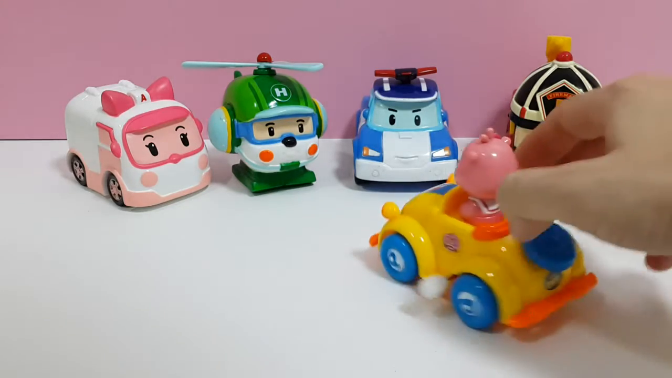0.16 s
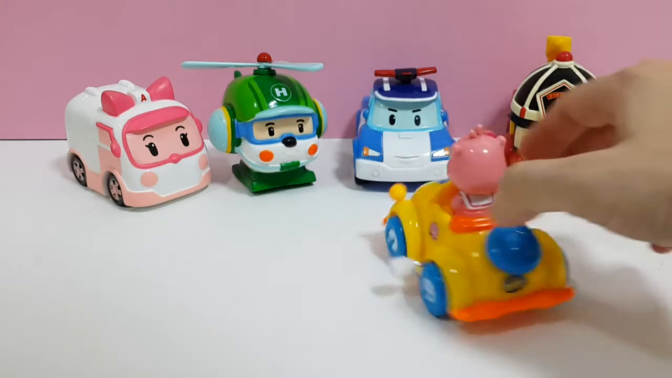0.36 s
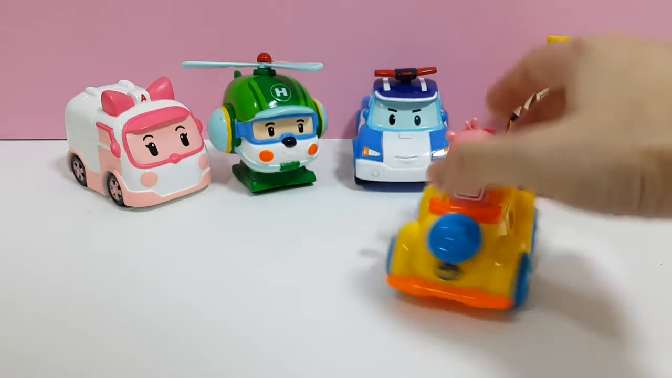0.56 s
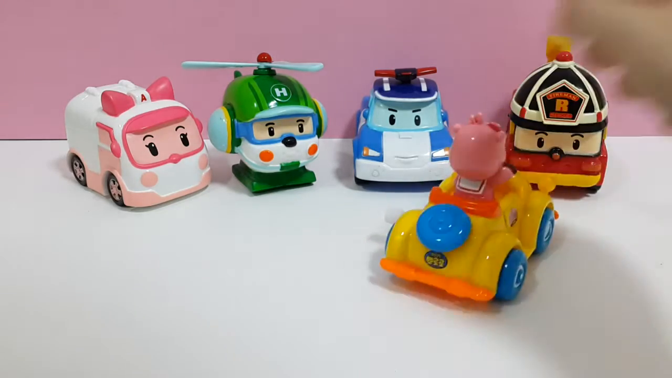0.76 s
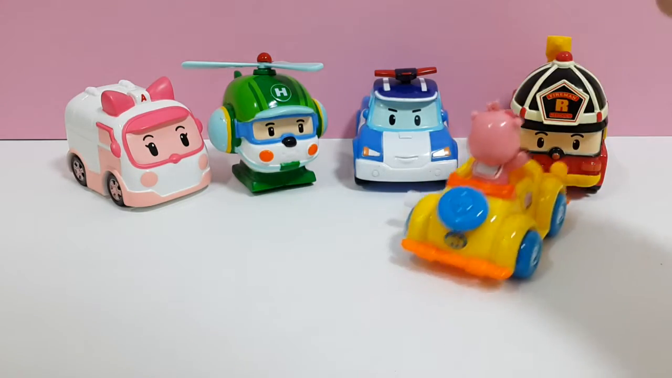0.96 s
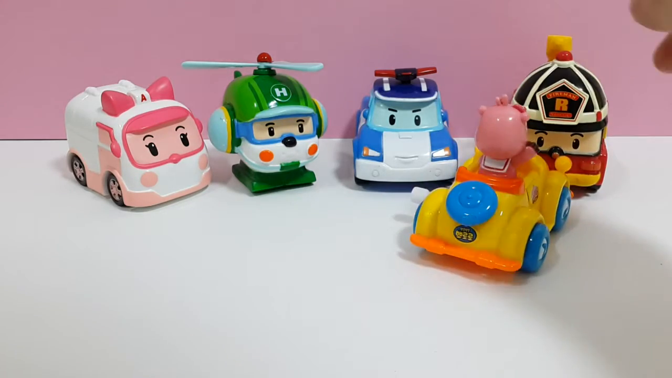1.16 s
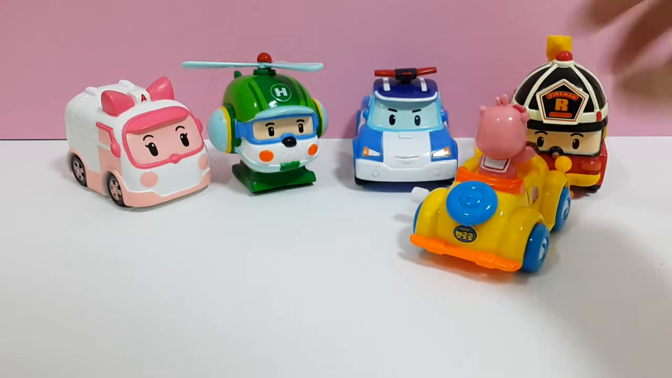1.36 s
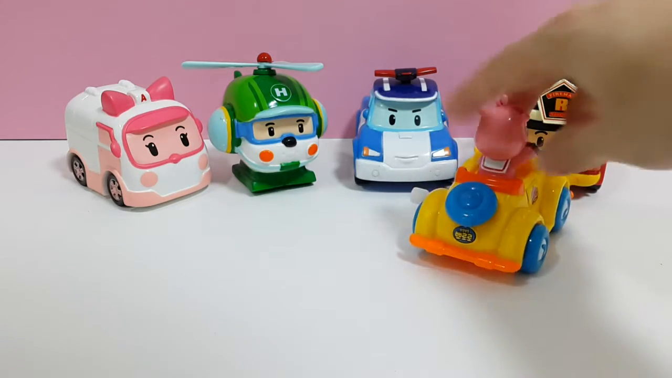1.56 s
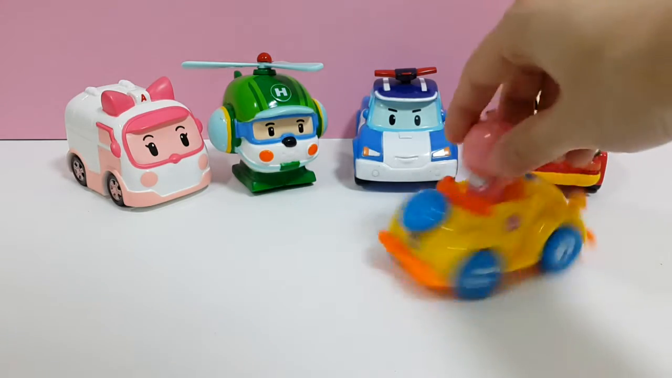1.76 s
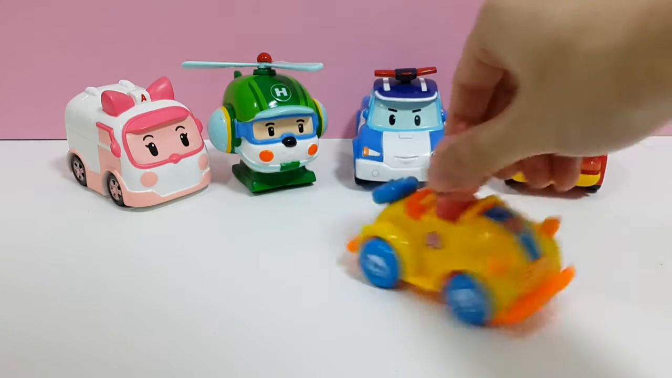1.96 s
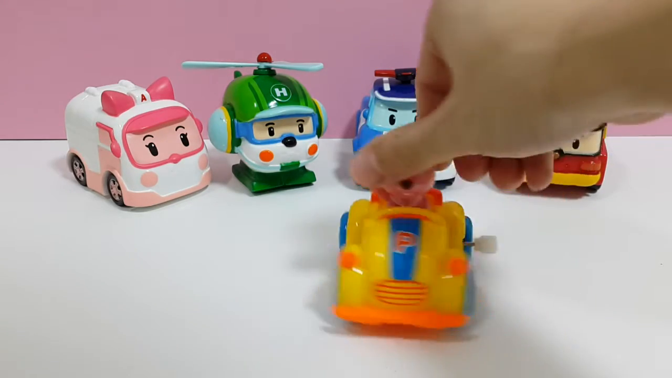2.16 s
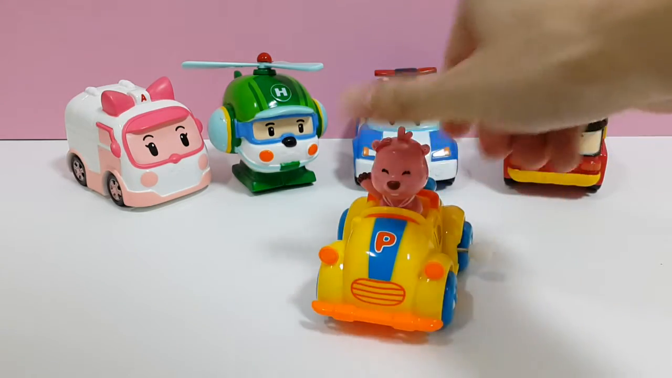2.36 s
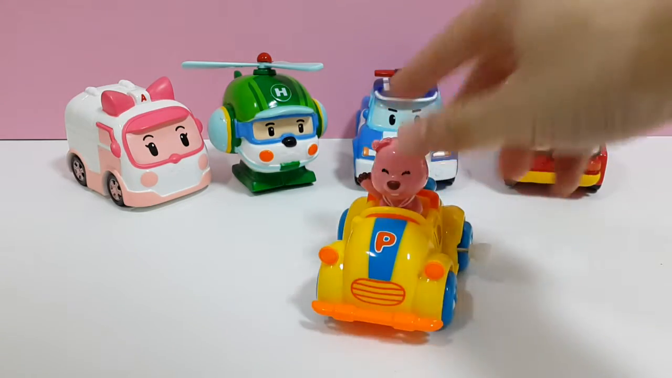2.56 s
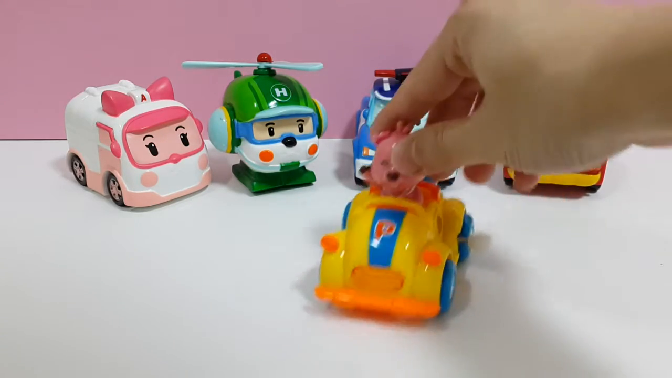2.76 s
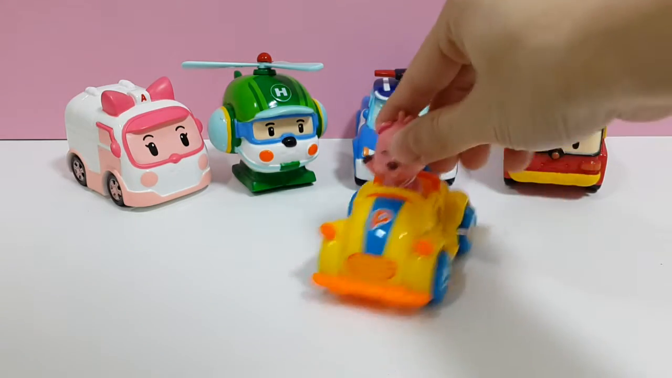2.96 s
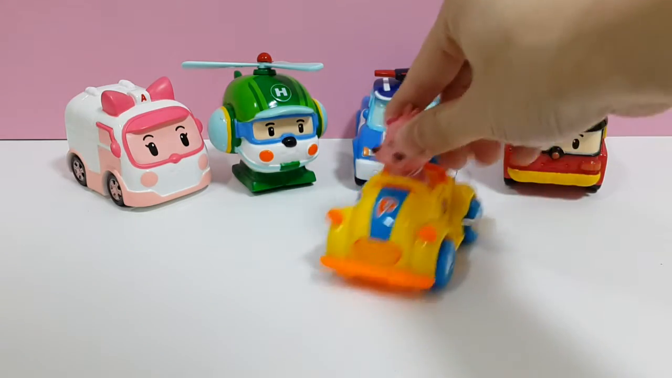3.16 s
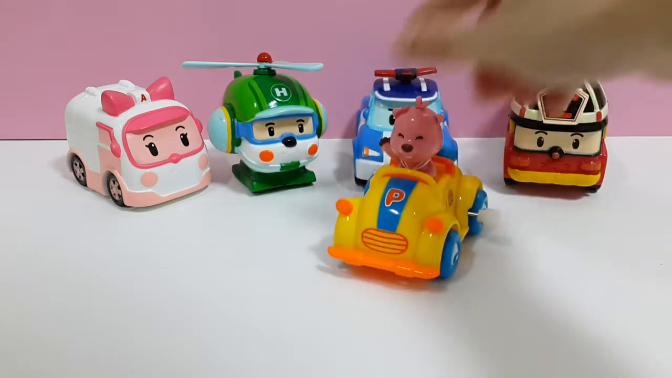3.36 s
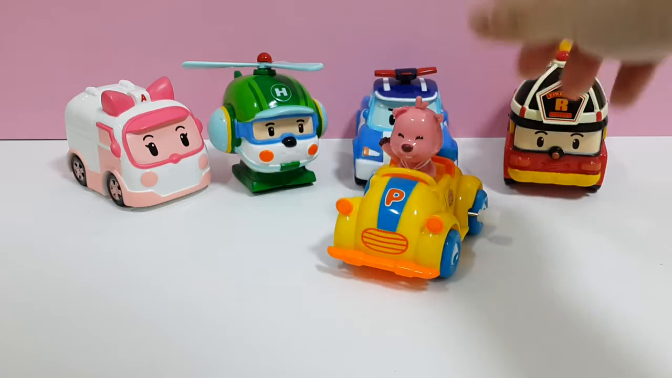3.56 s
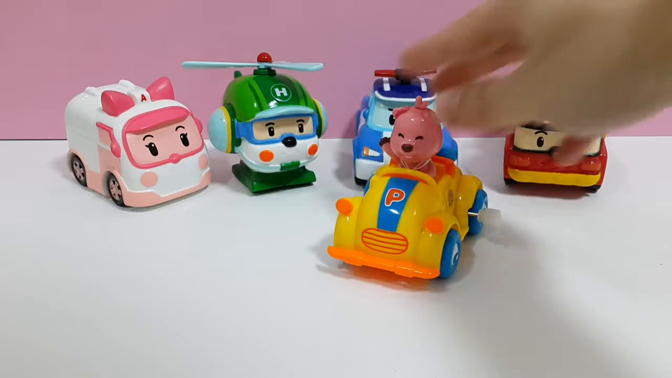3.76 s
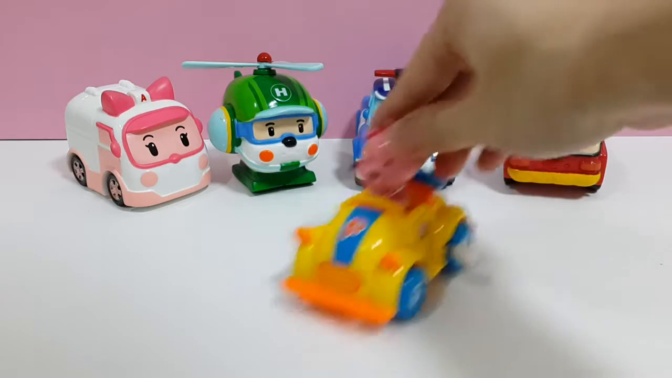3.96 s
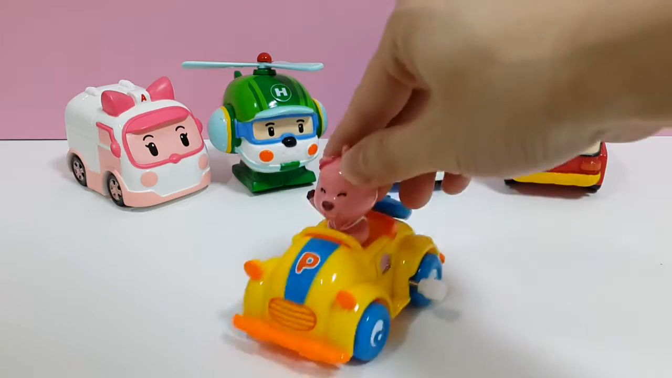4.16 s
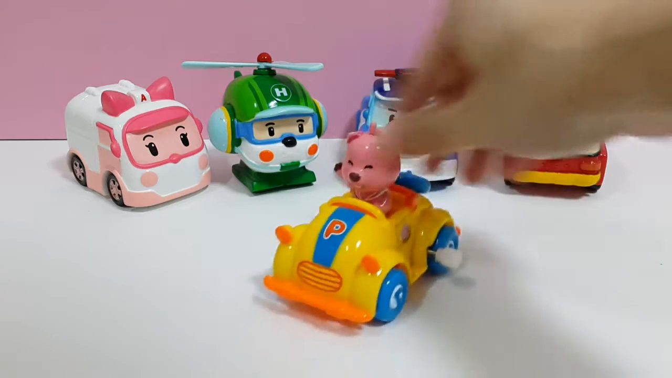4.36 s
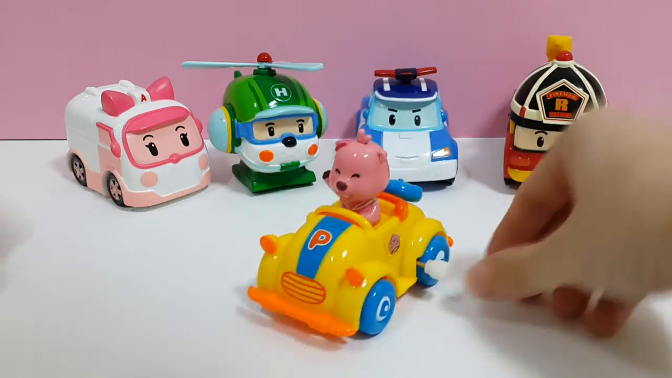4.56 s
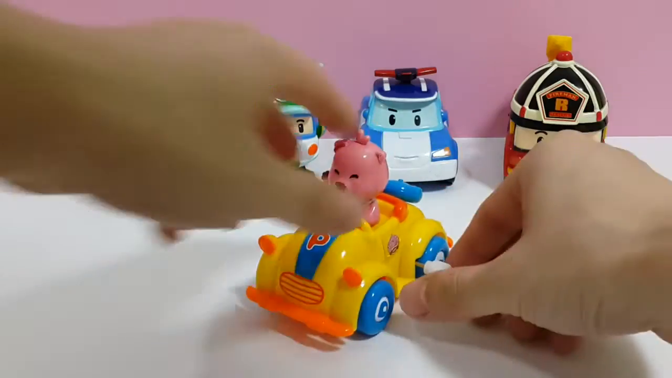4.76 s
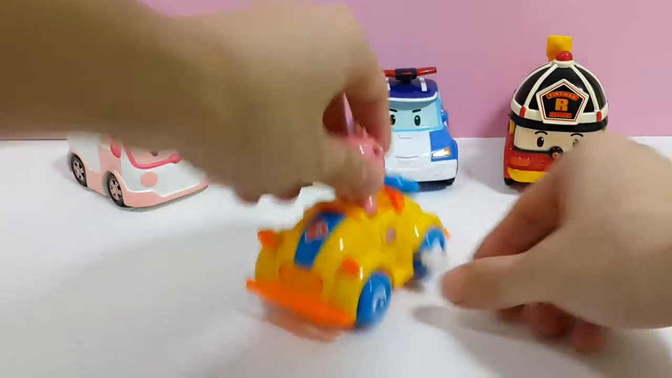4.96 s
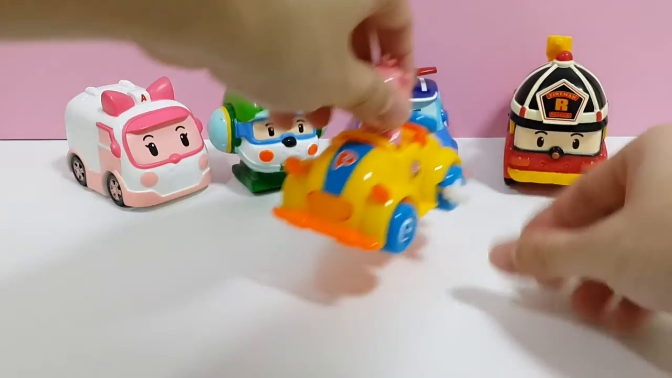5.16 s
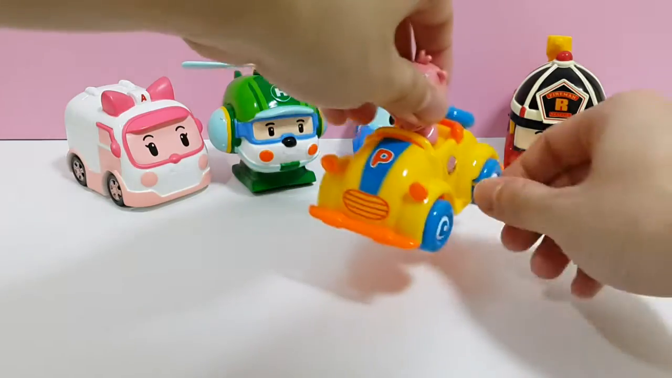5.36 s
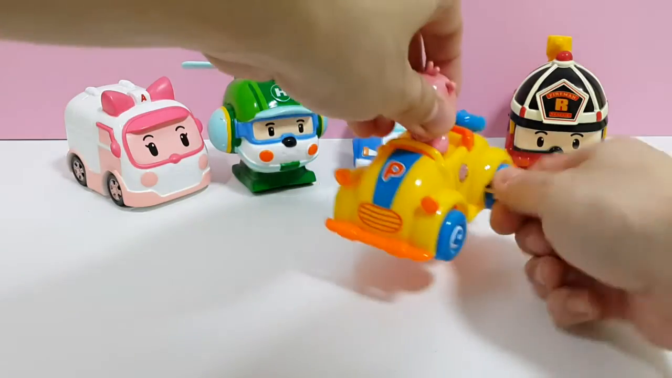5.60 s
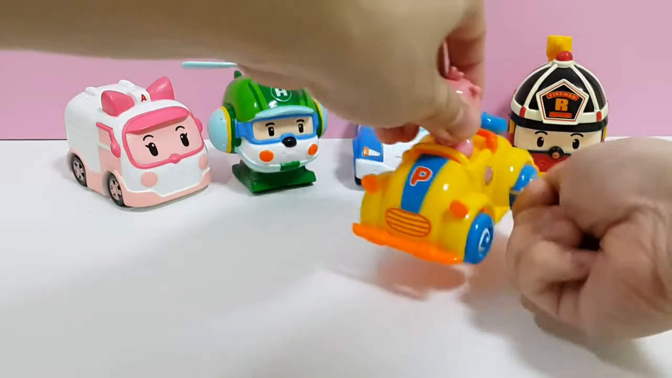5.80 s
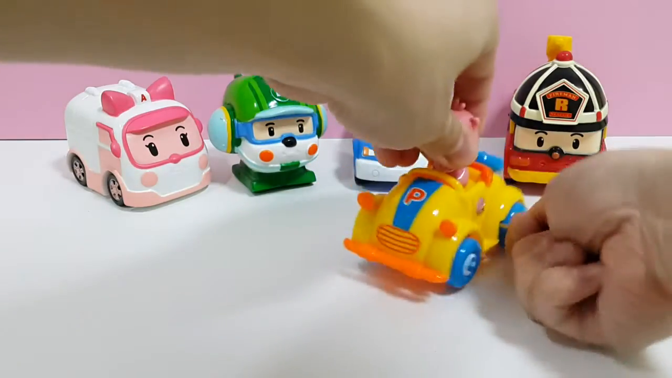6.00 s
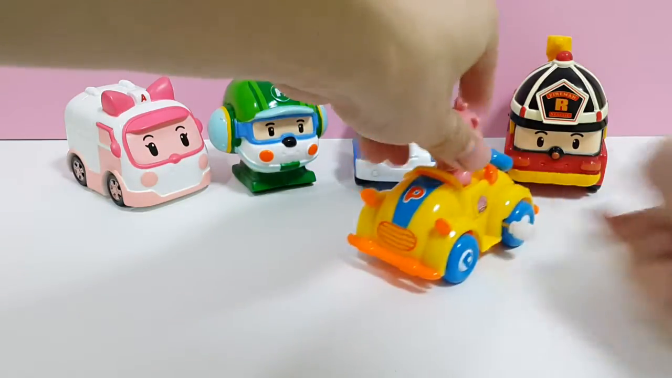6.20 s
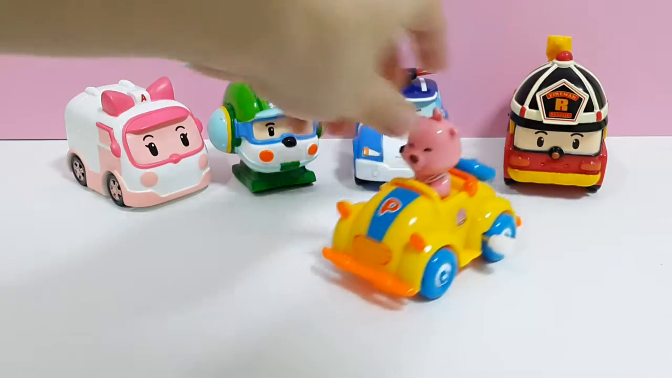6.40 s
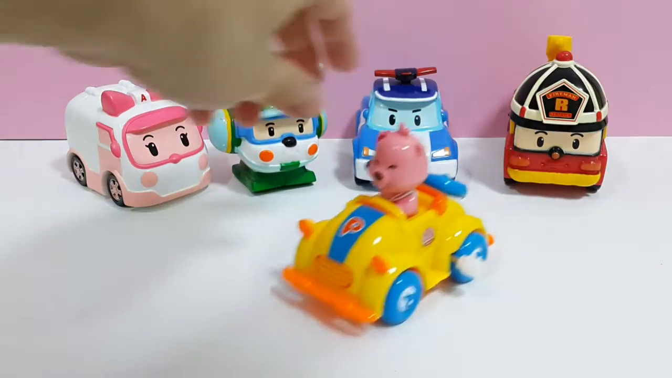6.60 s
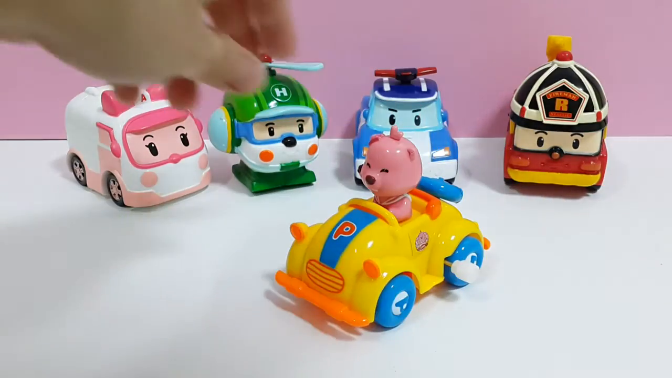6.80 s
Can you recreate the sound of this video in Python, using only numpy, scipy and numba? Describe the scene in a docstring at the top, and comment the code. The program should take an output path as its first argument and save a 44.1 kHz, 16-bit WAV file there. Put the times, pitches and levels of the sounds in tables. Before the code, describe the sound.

Close, bright plastic gear clicks come in stuttering bursts between quiet gaps, light taps and soft thuds, then a rapid key-winding ratchet and more bursts.

```python
"""In a small quiet room, a plastic wind-up car is pushed by hand on a table top close to a phone with two ports.
First the gear teeth rattle the hollow shell in bursts, and for a moment the spring runs free and clicks evenly.
Then wheels and fingers tap, faint squeaks and a high rustle pass and the table thuds, amid more gear bursts.
After taps that ring, the key's pawl snaps over its ratchet; a last group of bursts follows. Contacts are short
noise bursts through resonant modes; the room rings briefly over steady low rumble, hiss and faint tones."""
import sys
import numpy as np
from scipy import signal
from scipy.fft import rfft, irfft
from scipy.io import wavfile
from scipy.ndimage import uniform_filter1d
from numba import njit

SR = 44100
rng = np.random.default_rng(int(sys.argv[2]) if len(sys.argv) > 2 else 0)


def dump(signal):
    """Clip the signal to [-1, 1] and save it as 16-bit WAV at the path in sys.argv[1]."""
    limited = np.clip(np.atleast_2d(signal).T, -1, 1)
    pcm = np.round(limited * 32767).astype(np.int16)
    wavfile.write(sys.argv[1], SR, pcm)


N = 301644

# Single gear teeth, loud to faint, each at its own time: [t/s, relative level/dB]
SINGLE_TEETH = [(0.0507, -23), (0.075, -11), (0.098, -10), (0.1077, -7.5), (0.119, -7.5), (0.155, -8),
                (0.179, -9), (0.191, -10.5), (0.214, -8), (0.224, -7), (0.294, -9), (0.3194, -12.5),
                (0.3263, -10), (0.3365, -11), (0.416, -5.5), (0.424, -7.5), (0.435, -9.5), (0.4448, -8.5),
                (0.455, -12), (0.5814, -9.5), (0.563, -9.5), (0.76, -14.5), (1.0138, -18), (1.1067, -15),
                (1.7833, -20.5), (1.8094, -23.5), (1.9894, -19.5), (2.1947, -14.5), (2.883, -19),
                (3.0416, -18), (3.073, -20), (3.132, -18), (3.1475, -10), (3.182, -10.5), (3.2416, -12),
                (3.263, -7), (3.2739, -10.5), (3.3096, -8.5), (3.328, -12.5), (3.387, -17), (4.292, -9.5),
                (4.387, -11.5), (4.401, -11), (4.433, -8), (4.5502, -18.5), (4.576, -17), (4.622, -12.5),
                (4.6647, -13.5), (6.076, -21.5), (6.1614, -30.5), (6.1861, -34), (6.2769, -18.5),
                (6.3644, -8), (6.384, -19), (6.4486, -21), (6.5037, -12.5), (6.626, -13), (6.6489, -12)]
# Wheels and fingers tapping: [t/s, relative level/dB, low body gain/dB]
TAPS = [(1.7207, -55, 20), (1.8462, -17, 10), (2.136, -16.5, 3.5), (2.3566, -24, 11.5), (2.395, -33, 3),
        (2.835, -19, 3), (3.152, -11.5, -10), (4.1186, -38, 18), (4.1578, -35.5, 9), (4.6063, -19, -3),
        (4.7007, -25, 18), (5.0932, -22, 6.5), (5.14, -22.5, 5.5), (5.307, -42.5, 15), (5.417, -47.5, 16.5),
        (5.502, -30, 5), (5.6495, -39, 4), (6.0609, -19, 7), (6.1204, -21, 5), (6.2003, -27.5, 17.5),
        (6.2295, -14.5, 8.5), (6.745, -13, 1)]
# Mode clusters of the hollow shell: [mean f/Hz, width of one filter pass/Hz, relative level/dB]
SHELL_MODES = [(832, 420, -34), (1163, 340, -24), (1513, 210, -25), (1915, 380, -16), (2290, 670, -18.5),
               (2971, 660, -10), (4060, 1300, -8.5), (4727, 1100, -6), (5908, 1510, 0), (7230, 1300, -4.5),
               (7970, 3500, -4), (10770, 6100, -11.5), (13100, 4400, -15)]

COAST_S, COAST_DB = 0.035, -20  # the wheels drag on after the last tooth, fading by this much


def undb(db):
    """Turn dB into an amplitude factor."""
    return 10 ** (np.asarray(db) / 20)


def level(x, db):
    """Scale a signal to an rms level in dB."""
    return x * undb(db) / np.sqrt(np.mean(x ** 2))


def on_log(table, hz):
    """Read a (Hz, value) table on a log-frequency axis."""
    f, value = np.transpose(table)
    return np.interp(np.log(hz), np.log(f), value)


def band(x, hz, width):
    """Resonant band-pass, gain 1 at the centre."""
    return signal.lfilter(*signal.iirpeak(hz, hz / width, fs=SR), x + 1e-18)


def walk(rate):
    """Random levels held 1 / rate s and slewed twice; spread near 1."""
    hold = int(SR / rate)
    steps = np.repeat(rng.standard_normal(N // hold + 1), hold)
    return 1.3 * uniform_filter1d(uniform_filter1d(steps, hold), hold)[:N]


def smear(power, rise_s, fall_s):
    """Give each impulse of power a fast rise and an exponential fall; tail gain not normalized."""
    rise, fall = np.exp(-1 / (SR * rise_s)), np.exp(-1 / (SR * fall_s))
    return signal.lfilter([1 - rise], np.convolve([1, -rise], [1, -fall]), power)


def rebounds(at, db, count, within_s, drop_db):
    """A loose part bounces a few times around the main blow, weaker the further from it."""
    late = 1.3 * rng.random((len(at), count)) - 0.3  # some slip a little early
    late[:, 0] = 0  # the main blow itself
    gap = np.diff(at, append=np.inf)[:, None]
    drop_db = drop_db * (1 + np.exp(-(gap / 0.013) ** 4))  # little time to bounce in a fast run
    times = at[:, None] + within_s * late
    levels = db[:, None] - drop_db * np.sqrt(np.abs(late))
    return times.ravel(), levels.ravel()


def gears(spread_db, uneven, per_s=None, coast_s=0):
    """Uneven small contacts while the car moves: moments, levels, low body gain."""
    # Bursts of the gear train and slides of the wheels: [start t/s, length/s, contacts per s,
    # relative level/dB, level change by the end/dB, low body gain/dB]
    bursts = [(0, 0.035, 91, -27.5, -6, 5), (0.063, 0.16, 187, -20, 4.5, -3.5),
              (.268, 0.035, 157, -17, 0.5, -9.5), (0.326, 0.023, 170, -20.5, 4, -4),
              (0.395, 0.083, 164, -18.5, -1, -11.5), (0.478, 0.28, 250, -23, -11, -13.5),
              (0.747, 0.034, 174, -21.5, -0.5, -8.5), (0.804, 0.016, 261, -20.5, -2, -8.5),
              (0.843, 0.015, 250, -15, -17, -1.5), (0.878, 0.018, 218, -17.5, -8.5, -4),
              (0.934, 0.021, 130, -21, -9, -5.5), (0.974, 0.029, 140, -21.5, -8, 1.5),
              (1.031, 0.042, 166, -22.5, 1.5, -1.5), (1.099, 0.065, 154, -24.5, -3.5, -6),
              (1.166, 0.022, 160, -19.5, -12, 3), (1.203, .012, 170, -26, 2, -5.5),
              (1.243, 0.035, 140, -23, -14, -6), (1.836, 0.03, 132, -22.5, -10, -0.5),
              (1.867, 0.22, 300, -35.5, 5, 13), (2.143, 0.094, 440, -31, -1, 11),
              (2.284, 0.067, 250, -36.5, -8.5, 14.5), (2.825, 0.031, 136, -27, -3, 5),
              (2.9, 0.13, 126, -17.5, -3, -3), (3.14, 0.018, 210, -17.5, -1, 3),
              (3.172, 0.055, 156, -21, -6, 1.5), (3.26, 0.027, 153, -11, -4, -9.5),
              (3.292, 0.094, 132, -14, -5.5, -7), (3.992, 0.28, 200, -50.5, 6, 15.5),
              (4.277, .035, 120, -12.5, -17.5, -2.5), (4.372, 0.12, 132, -17, -4.5, -0.5),
              (4.543, .13, 123, -24.5, 0.5, 4.5), (4.712, 0.1, 310, -41, -6, -1),
              (5.075, 0.079, 210, -34.5, -13.5, 10.5), (6.061, 0.17, 150, -42, -5.5, 13),
              (6.228, 0.066, 108, -21.5, -19, 7.5), (6.328, 0.055, 155, -23, 1, 3.5),
              (6.418, 0.063, 103, -15.5, -10.5, -4), (6.494, 0.029, 126, -15.5, -14, -8),
              (6.549, 0.02, 153, -16.5, -9, 2.5), (6.584, 0.024, 160, -16, -5, -1),
              (6.62, 0.038, 151, -14.5, -11, -1), (6.681, 0.019, 133, -17, -4, -4.5),
              (6.712, 0.054, 149, -17.5, -7.5, -1)]
    swell_s, swell_db = 0.006, -5  # a burst starts this much softer and needs up to this long to bite
    soften = 0.44  # dB of low body gained per dB that a burst weakens
    rows = []
    for start, length, teeth_per_s, db, change_db, body_db in bursts:
        rate = per_s or teeth_per_s
        u = rng.random((1000, 2))[:int(rate * (length + coast_s)) + 1]
        since = (np.arange(len(u)) + uneven * (u[:, 0] - u[0, 0])) / rate
        fade_db = np.interp(since, [0, min(swell_s, length / 2), length, length + COAST_S],
                            [swell_db, 0, change_db, change_db + COAST_DB])
        contact_db = db + fade_db - spread_db * np.log(1 - u[:, 1])
        rows.append([start + since, contact_db, body_db - soften * np.minimum(fade_db, 6)])
    return np.hstack(rows)


@njit
def sway(x, g, k):
    """Band-pass applied twice, whose centre may move from sample to sample."""
    y = x.copy()
    for _ in range(2):
        b, l = 0., 0.  # band and low-pass states
        for i in range(len(y)):
            v = (b + g[i] * (y[i] - l)) / (1 + g[i] * (g[i] + k))
            b, l, y[i] = 2 * v - b, l + 2 * g[i] * v, k * v
    return y


def strike(at, db, body_db, modes, rise_s, fall_s, scatter_db, loose=1):
    """Each contact is a quick buzz of tiny bounces; it shakes every cluster of modes with its own strength."""
    # Balance of the phone's two ports: [f/Hz, left minus right level/dB]
    port_balance = [(700, 4.5), (2000, 0), (4400, 3.5), (6500, 6.5), (9000, -12.5), (14000, -10)]
    body_hz = 2570  # upper corner of the low body
    crack_db = -8.5  # first clean blow of a contact against its buzz
    drift = 0.037  # scale of the modes' wander, as a share, as the car is turned and held
    left_right = np.array([[1], [-1]])
    chance = rng.standard_normal((len(at), len(modes)))
    facing = rng.standard_normal(len(at))
    spot = np.clip((at * SR).astype(int), 0, N - 1)
    heard = slice(spot.min(), min(spot.max() + SR // 10, N))  # silent before and soon after
    t = np.arange(N)[heard] / SR
    out = np.zeros((2, N))
    for k, ((hz, width, mode_db), own) in enumerate(zip(modes, chance.T)):
        # a softer contact favours the body and loses the top
        low = 1 / (1 + (hz / body_hz) ** 4) / (1 + (900 / hz) ** 2)
        dull = 0.5 / (1 + (7000 / hz) ** 4)
        # fingers and table damp each cluster differently as the car turns
        grip_db = 3 * loose * np.interp(12 * at, np.arange(100), rng.standard_normal(100))
        size = undb(db + grip_db + mode_db + (low - dull) * body_db + scatter_db * own)

        power = np.bincount(spot, size ** 2, N)[heard]
        mode_fall_s = fall_s * (hz / 6000) ** -0.4  # the treble dies first
        power = smear(power + 1e-24, rise_s, mode_fall_s)
        mid, side = np.sqrt(np.abs(power) * SR / width) * rng.standard_normal((2, len(power)))

        fall = np.exp(-1 / (SR * mode_fall_s))
        crack = (-1) ** k * undb(crack_db) * size * np.sqrt(SR / width / (1 - fall))
        mid = mid + np.bincount(spot, crack, N)[heard]
        side = side + np.bincount(spot, crack * facing, N)[heard]

        # the two ports hear the treble from different sides
        alike = 1 / (1 + (hz / 3500) ** 4.0)
        both = np.sqrt(1 + alike) * mid + np.sqrt(1 - alike) * side * left_right
        wander = np.interp(15 * t, np.arange(120), rng.standard_normal(120))
        g = np.tan(np.pi * hz * (1 + drift * loose * wander) / SR)
        ringing = np.array([sway(x, g, width / hz) for x in both])
        out[:, heard] += ringing * undb(on_log(port_balance, hz) / 2 * left_right)
    return out * undb(-9.0)


def air():
    """Low rumble of the building and the microphone's hiss, with a faint hum and a thin high tone."""
    # Noise spectrum of room and microphone: [f/Hz, relative density/dB]
    noise_spectrum = [(25, -22.5), (43, -40), (75, -5), (131, -10.5), (167, -3.5), (202, -17.5), (286, -12),
                      (363, -27.5), (404, -12.5), (488, -29.5), (700, -31), (15000, -36.5)]
    # Hum and high tone, as narrow noise: [f/Hz, width/Hz, rms level ahead of the phone/dB]
    tones = [(162, 6, -67), (9320, 12, -86.5)]
    hz = np.maximum(np.fft.rfftfreq(N, 1 / SR), 10)
    alike = 1 / (1 + hz / 1200) * hz / (hz + 15)  # likeness of the two ports
    mid, side = rfft(rng.standard_normal((2, N))) * undb(on_log(noise_spectrum, hz))
    both = np.array([np.sqrt(1 + alike) * mid + k * np.sqrt(1 - alike) * side for k in (1, -1)])
    bass = irfft(both / (1 + (hz / 500) ** 2), N)
    flicker = undb(2.8 * walk(2.5)) - 1  # the bass level wanders
    out = level(irfft(both, N) + bass * flicker, -59.5)
    return out + sum(level(band(rng.standard_normal(N), f, width), db) for f, width, db in tones)


def room(dry):
    """Dense reflections that build up within a few ms and fade band by band."""
    # Decay of the small room: [f/Hz, time to fade 60 dB/s, relative level/dB]
    decay_bands = [(1050, 0.41, -16.5), (3100, 0.19, -12.5), (6200, 0.34, -16.5), (11100, 0.22, -11.5)]
    t = np.arange(SR // 2) / SR
    rise = 1 - np.exp(-t / 0.0008)
    tail = 0
    for hz, t60, db in decay_bands:
        noise = band(rng.standard_normal((2, len(t))), hz, 0.54 * hz)
        tail = tail + level(noise * undb(-60 * t / t60) * rise, db)
    return signal.fftconvolve(dry, tail / np.sqrt(len(t)), axes=1)[:, :N]


def thuds():
    """The table top answers taps, drops and rolling wheels with a short dull rumble."""
    # Wheels dropping onto the table: [t/s, relative level/dB]
    drops = [(0.082, -48), (0.224, -52.5), (0.364, -56), (.842, -60), (0.882, -55), (4.431, -60),
             (6.333, -51), (6.414, -47.5), (6.494, -48.5)]
    # Modes of the table top: [f/Hz, width of one filter pass/Hz, relative level/dB]
    table_modes = [(172, 313, 1), (420.6, 41, -3), (694, 74, -4)]
    thud_db, per_db, per_body_db = -45, 1.18, 1.46  # the thud grows with the tap and with its softness
    roll_db = -45  # rumble under the moving wheels
    tap_at, tap_db, tap_body_db = np.transpose(TAPS)
    drop_at, drop_db = np.transpose(drops)
    roll_at, contact_db, soft_db = gears(spread_db=3., uneven=1., per_s=60.)
    at = np.concatenate([tap_at, drop_at, roll_at])
    db = np.concatenate([thud_db + per_db * tap_db + per_body_db * tap_body_db, drop_db,
                         roll_db + per_db * contact_db + per_body_db * soft_db])
    power = smear(np.bincount((at * SR).astype(int), undb(2 * db), N), 0.0023, 0.013)
    noise = rng.standard_normal(N) + 0.48 * rng.standard_normal((2, N))  # mostly common to both ports
    shake = np.sqrt(np.abs(power)) * noise
    return 14 * sum(undb(db) * band(band(shake, hz, width), hz, width) for hz, width, db in table_modes)


def squeaks_and_rustle():
    """Stick and slip, and last a rustle, are fluttering noise in one narrow resonance each, swelling and fading."""
    # Faint squeaks while sliding, and last a high rustle: [start t/s, length/s, f/Hz, relative level/dB]
    faint_sounds = [(1.913, 0.057, 4864, -42.5), (2.02, 0.083, 4900, -44.5), (4.045, 0.21, 4695, -63),
                    (4.936, 0.14, 9000, -59)]
    t = np.arange(N) / SR
    flutter = rng.standard_normal(N) * undb(3.3 * walk(60))
    out = 0
    for at, length, hz, db in faint_sounds:
        swell = np.sin(np.pi * np.clip((t - at) / length, 0, 1))
        out = out + level(band(flutter, hz, 0.06 * hz), db) * swell
    return out


def pings():
    """Held in the air, the shell rings on one low mode when a finger taps it."""
    # Taps that ring: [t/s, relative level/dB, f/Hz]
    ringing_taps = [(5.0932, -27, 1927), (5.5024, -26.5, 1956)]
    t60_s = 0.034
    t = np.arange(N) / SR
    out = 0
    for at, db, hz in ringing_taps:
        fade = undb(db - 60 * np.abs(t - at) / t60_s)
        out = out + fade * np.sin(2 * np.pi * hz * (t - at)) * (t > at)
    return out


def pawl():
    """The winding key's pawl snaps into the next tooth and the spring box buzzes."""
    # Snaps of the pawl: [t/s, relative level/dB]
    snaps = [(5.684, -8.5), (5.7048, -8.5), (5.7188, -8.5), (5.7295, -7.5), (5.7427, -8), (5.757, -8),
             (5.7753, -6.5), (5.7942, -8), (5.8069, -6.5), (5.8193, -7.5), (5.8322, -9.5), (5.846, -9),
             (5.8601, -5), (5.8722, -11), (5.8835, -7.5), (5.8964, -7), (5.9104, -4.5), (5.9289, -9),
             (5.9622, -7.5)]
    # Mode clusters of the spring box: [f/Hz, width of one filter pass/Hz, relative level/dB]
    box_modes = [(1965, 700, -27), (2970, 1100, -27), (5130, 1270, -13), (6170, 880, -6.5),
                 (7170, 1100, -12), (7850, 1500, -11.5), (9250, 1200, -17.5), (11100, 2500, -4.5),
                 (13900, 2100, -13)]
    at, db = np.transpose(snaps)
    # gripped firmly, so nothing wanders
    return strike(at, db, 0, box_modes, rise_s=0.0003, fall_s=0.0014, scatter_db=1., loose=0)


def free_run():
    """The spring runs free: one crisp click each time the gear has turned by a whole tooth."""
    # Speed of the gear: [t/s, teeth per s]
    gear_speed = [(.487, 101), (.545, 97), (0.576, 82), (.61, 100), (.67, 126), (.742, 118)]
    t, per_s = np.transpose(gear_speed)
    fine = np.arange(t[0], t[-1], 1 / SR)
    turned = np.cumsum(np.interp(fine, t, per_s)) / SR
    at = np.interp(np.arange(int(turned[-1]) + 1), turned, fine)
    db = -13.5 + 1.5 * rng.standard_normal(100)[:len(at)]
    return strike(at, db, -7.0, SHELL_MODES, rise_s=0.0002, fall_s=0.00083, scatter_db=0.0)


def taps():
    """Wheels and fingers tap the shell, and loose parts bounce around each tap."""
    at, db, body_db = np.transpose(TAPS)
    at, db = rebounds(at, db, count=3, within_s=0.013, drop_db=13.0)
    return strike(at, db, np.repeat(body_db, 3), SHELL_MODES, rise_s=0.00016, fall_s=0.00096, scatter_db=3.5)


def wheel_drag():
    """Dense small contacts of the dragging wheels scrape the shell and coast on after each burst."""
    at, db, body_db = gears(spread_db=1., uneven=1., per_s=900., coast_s=COAST_S)
    db = db - 15 + 0.32 * body_db  # softer motion scrapes more
    return strike(at, db, body_db, SHELL_MODES, rise_s=0.00071, fall_s=0.0015, scatter_db=4.0)


def small_teeth():
    """The run of small gear teeth shakes the hollow shell at the tooth rate of each burst."""
    at, db, body_db = gears(spread_db=1., uneven=0.35)
    to_single = np.min(np.abs(at[:, None] - np.transpose(SINGLE_TEETH)[0]), axis=1)
    db = db - 20 * (to_single < 0.007)  # small teeth stay quiet within 7 ms of a singly timed tooth
    return strike(at, db - 0.4 * body_db, body_db, SHELL_MODES, rise_s=0.0004, fall_s=0.0013, scatter_db=3.)


def single_teeth():
    """Single gear teeth, loud to faint, slip at their own times and loose parts bounce around each blow."""
    at, db = rebounds(*np.transpose(SINGLE_TEETH), count=4, within_s=0.01, drop_db=13.5)
    return strike(at, db - 2.5, -2.5, SHELL_MODES, rise_s=0.0004, fall_s=0.0011, scatter_db=2.)


def scene():
    """The car, too small to send out bass, close by on the table in the room."""
    car = squeaks_and_rustle() + pings() + pawl() + free_run()
    car = car + taps() + wheel_drag() + small_teeth() + single_teeth()
    car = signal.sosfilt(signal.butter(2, 500, "high", fs=SR, output="sos"), car)
    return air() + room(car) + thuds() + car


def record(dry):
    """The phone rounds the loudest peaks and cuts the top above 14.8 kHz."""
    rounded = np.tanh(0.61 * dry) / 0.65
    return signal.sosfilt(signal.ellip(8, 0.2, 70, 14800, fs=SR, output="sos"), rounded)


dry = scene()
out = record(dry)
dump(out)
```